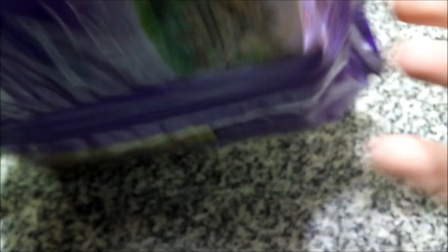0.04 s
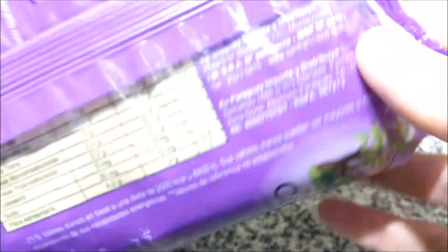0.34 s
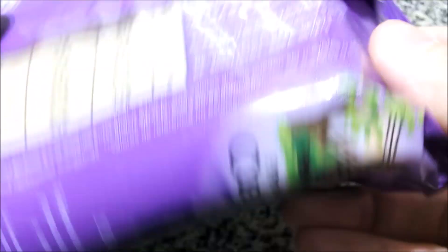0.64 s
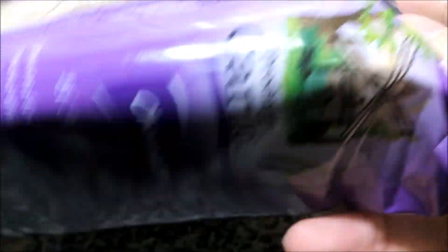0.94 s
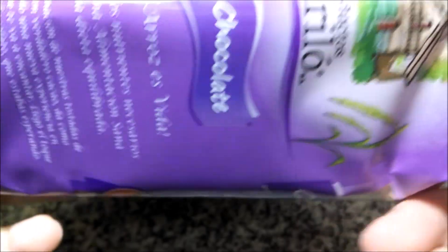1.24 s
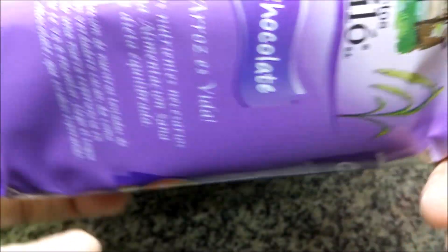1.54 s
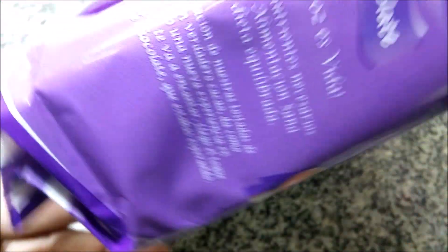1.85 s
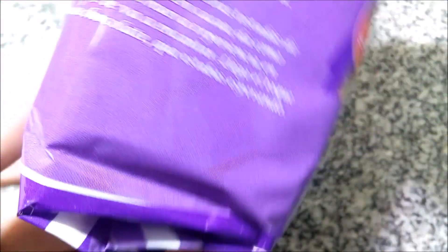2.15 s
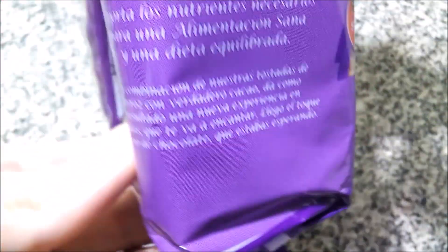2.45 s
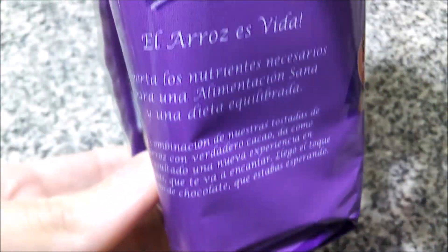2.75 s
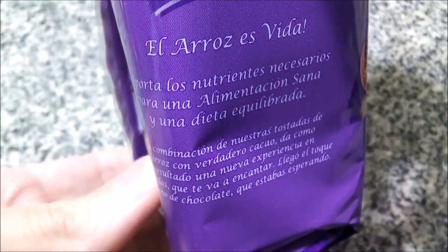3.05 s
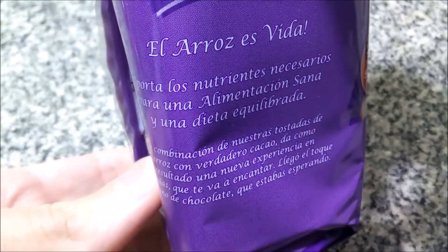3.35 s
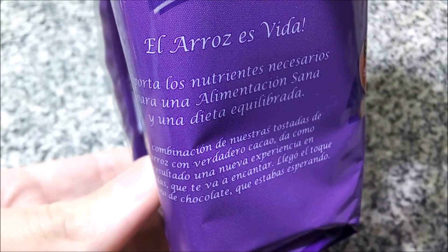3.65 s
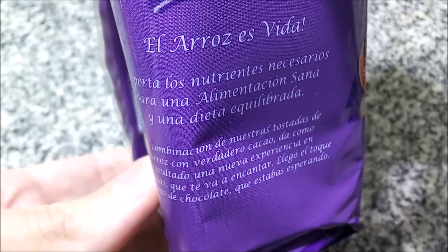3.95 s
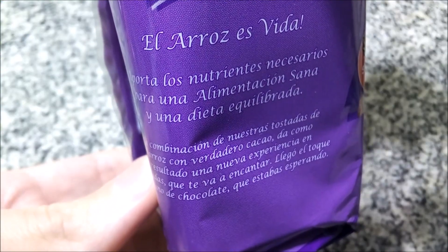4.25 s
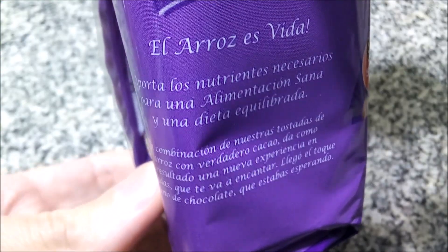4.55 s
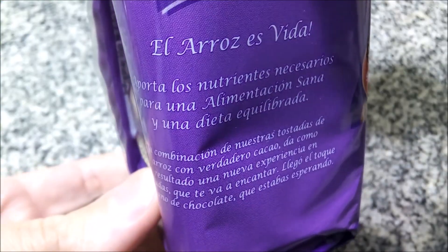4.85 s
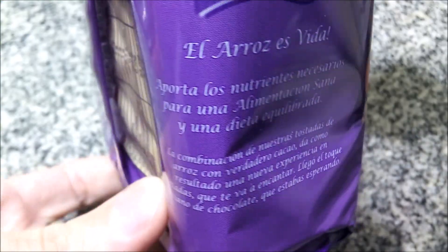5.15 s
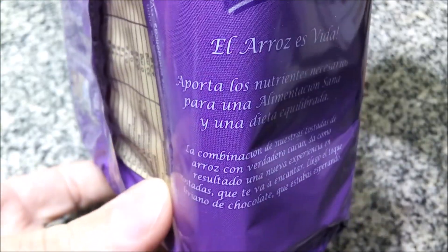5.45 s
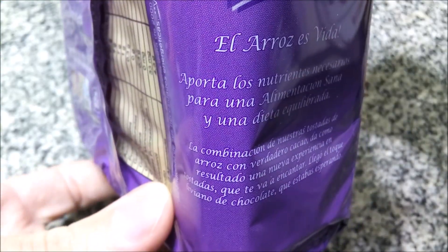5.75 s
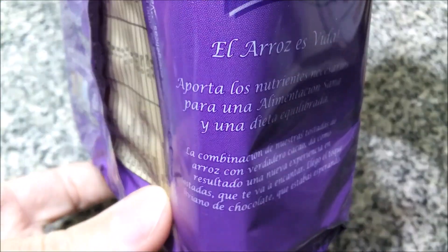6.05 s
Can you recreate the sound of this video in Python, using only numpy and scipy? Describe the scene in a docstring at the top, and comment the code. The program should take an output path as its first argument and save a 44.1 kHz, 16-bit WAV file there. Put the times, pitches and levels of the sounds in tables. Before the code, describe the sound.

Close, crisp crinkling of a plastic packet being handled, busy at first, then pausing before a few lighter crackles.

```python
"""In a small quiet room, a plastic snack packet is turned over above a stone counter, near a phone.
Each fresh grip loads the film: tiny creases crackle and the fingers slide until it relaxes.
Large creases snap through one by one, rattling the sheet and exciting the air modes of the pouch.
Short pitched pops and dull ticks colour some snaps. Counter and room reflect it all over a faint hum."""
import sys
import numpy as np
from scipy import signal
from scipy.fft import rfft, irfft
from scipy.io import wavfile

SR = 44100
rng = np.random.default_rng(int(sys.argv[2]) if len(sys.argv) > 2 else 0)


def master_out(mix):
    """Clip the mix to full scale and print it as 16-bit PCM to the path in sys.argv[1]."""
    frames = np.transpose(np.atleast_2d(mix))
    ceiling = np.clip(frames, -1, 1)
    pcm = np.round(ceiling * 32767).astype(np.int16)
    wavfile.write(sys.argv[1], SR, pcm)


N = 277389


def undb(db):
    """Amplitude ratio of a level in decibels."""
    return 10 ** (np.asarray(db) / 20)


def unit(x):
    """Normalisation to rms 1."""
    return x / np.sqrt(np.mean(x ** 2))


def noise(size):
    """Gaussian white noise."""
    return rng.standard_normal(size)


def band(x, lo_hz, hi_hz, order=2):
    """Causal Butterworth band-pass."""
    sos = signal.butter(order, [lo_hz, min(hi_hz, .48 * SR)], "band", fs=SR, output="sos")
    return signal.sosfilt(sos, x)


def resonate(x, hz, width_hz):
    """Forced response of a damped oscillator, gain 1 at resonance."""
    return signal.lfilter(*signal.iirpeak(hz, hz / width_hz, fs=SR), x)


def resonate_twice(x, hz, width_hz):
    """Two equal resonators in cascade: a narrower peak with steeper skirts."""
    return resonate(resonate(x, hz, width_hz), hz, width_hz)


def response(points, size=2048):
    """Minimum-phase impulse response of a spectrum given as (f/Hz, level/dB) points."""
    hz, db = np.transpose(points)
    grid_hz = np.fft.rfftfreq(size, 1 / SR) + 1
    magnitude = undb(np.interp(np.log(grid_hz), np.log(hz), db))
    cepstrum = irfft(np.log(magnitude))
    cepstrum[1:size // 2] *= 2
    cepstrum[size // 2 + 1:] = 0
    return irfft(np.exp(rfft(cepstrum)))


def through(x, h):
    """Convolution with an impulse response."""
    return signal.fftconvolve(x, h)[:len(x)]


def drift(per_s):
    """Random modulation: straight lines between Gaussian values of spread 1."""
    knots = noise(int(N / SR * per_s) + 2)
    return np.interp(np.arange(N) / SR * per_s, np.arange(len(knots)), knots)


def burst(x, db):
    """Energy normalisation: a transient gets the energy of 5 ms at this level."""
    return x * undb(db) * np.sqrt(.005 * SR / np.sum(x ** 2))


def room_air(air_db=-70.5):
    """Ambient noise: a low broadband murmur with narrow bands heard as hum and whine."""
    # spectrum of the still air: f/Hz, level/dB
    air_spectrum = [(25, -18.5), (90, -15.5), (125, -4), (190, -0.5), (300, -11), (500, -15), (900, -14.5),
                    (2000, -25), (5000, -23.5), (8500, -21), (10000, -30.5), (16000, -34.5)]
    # steady tones: f/Hz, bandwidth/Hz, level/dB
    tones = [(117.03, 3.3, -84), (179.8, 5.6, -84.5), (4700, 140, -89.5), (7950, 130, -82.5)]
    murmur = unit(through(noise(N), response(air_spectrum))) * undb(air_db + 0.4 * drift(8.1))
    hum = sum(undb(db) * unit(resonate_twice(noise(N), hz, width)) for hz, width, db in tones)
    return murmur + hum


def handling_level(attack_s=0.017, relax_s=0.034):
    """Rustle level in dB: each grip loads the film, holds and relaxes exponentially; powers add."""
    # rustle of the whole packet being moved: t/s, level/dB
    movement = [(0, -50), (1.15, -49), (1.55, -61.5), (1.75, -52), (2.5, -51), (3.1, -65.5), (3.3, -82),
                (4.6, -84), (4.9, -63.5), (5.45, -62), (5.7, -85.5)]
    # fresh grips: onset t/s, hold t/s, level/dB
    grips = [(0.0, 0.15, -34.5), (.28, 0.016, -43.5), (.38, 0.2, -39), (.6, 0.036, -32.5),
             (.78, 0.082, -39.5), (1.034, 0.016, -41), (1.188, 0.015, -39), (1.331, 0.12, -50.5),
             (1.631, 0.09, -54), (2.03, 0.15, -47), (2.208, 0.15, -39), (2.38, 0.15, -44.5),
             (2.698, 0.037, -45.5), (4.522, 0.09, -55), (4.769, 0.052, -54.5), (4.869, 0.038, -48.5),
             (5.058, 0.025, -42), (5.16, 0.14, -52.5), (5.322, 0.09, -54.5), (5.52, 0.065, -60.5)]
    t = np.arange(N) / SR
    power = undb(np.interp(t, *np.transpose(movement))) ** 2
    for start, held, db in grips:
        attack = np.clip(1 + (t - start) / attack_s, 0, 1)
        release = np.exp(-np.maximum(t - start - held, 0) / relax_s)
        power += (undb(db) * attack * release) ** 2
    return 10 * np.log10(power)


def buckle(ring_db, ring_s, slip_s=0.00045, scatter_db=-5, size=2048, modes=12):
    """Buckling: a crease flips abruptly; bending waves scatter and briefly ring the panels round it."""
    t = np.arange(size) / SR
    flip = unit(noise(size) * t * np.exp(-2 * t / slip_s))
    panel_hz = rng.uniform(1400, 10000, (modes, 1))
    phase_cycles = rng.random((modes, 1))
    panels = unit(np.sin(2 * np.pi * (panel_hz * t + phase_cycles)).sum(axis=0))
    scatter = undb(scatter_db) * noise(size)
    fade = np.exp(-t / ring_s) * (1 - np.exp(-t / slip_s))
    return flip + undb(ring_db) * unit((scatter + panels) * fade)


def crackle(film, handling_db, spread_db=6.5, bunch_db=5, ticks_db=-2.5, hollow_db=-20.5, creases=18):
    """Clustered Poisson process: tiny creases tick, faster in a firm grip, each ringing its own panel."""
    rate = 240 * undb(.3 * (handling_db + 46))
    chance = rate * undb(bunch_db * drift(70)) / creases / SR  # ticks come in irregular bunches
    crease_pitches = np.geomspace(2400, 11000, creases)
    panel_pitches = rng.permutation(np.geomspace(420, 1400, creases))
    ticks, hollow = np.zeros(N), np.zeros(N)
    for hz, panel_hz in zip(crease_pitches, panel_pitches):
        fires = rng.random(N) < chance
        sizes = np.zeros(N)
        sizes[fires] = undb(spread_db * np.minimum(rng.exponential(size=fires.sum()), 2.8))
        tick = through(sizes / np.sqrt(rate), buckle(ring_db=-11, ring_s=.003, slip_s=.0003))
        ticks += resonate(tick, hz, width_hz=0.5 * hz)
        hollow += resonate(tick, panel_hz, width_hz=70) / panel_hz
    radiated = unit(through(ticks, film))
    return undb(handling_db) * (undb(ticks_db) * radiated + undb(hollow_db) * unit(hollow))


def finger_friction(film, handling_db, hiss_db=-5.5, rough_db=3.5, rumble_db=-26.5):
    """Sliding friction: skin drags unevenly over the film and hisses; the shifting grip rumbles."""
    # fingertip strokes: onset t/s, duration t/s, centre f/Hz, bandwidth/Hz, level/dB
    strokes = [(3.753, 0.17, 5020, 3410, -71), (4.28, 0.3, 5580, 7570, -61.5),
               (5.244, 0.23, 1530, 1690, -61.5), (6.177, 0.069, 5360, 3550, -65.5)]
    hiss = through(noise(N), film) * undb(rough_db * drift(90))
    rumble = unit(band(noise(N), 130, 260)) * undb(rough_db * drift(30))
    out = undb(handling_db) * (undb(hiss_db) * unit(hiss) + undb(rumble_db) * rumble)
    for start, length, hz, width, db in strokes:
        progress = np.clip((np.arange(N) / SR - start) / length, 0, 1)
        speed = np.abs(np.sin(np.pi * progress))
        catches = hiss * undb(rough_db * drift(400))
        out += undb(db) * np.sqrt(speed) * unit(resonate_twice(catches, hz, width))
    return out


def pouch(push, detune=0.046):
    """Cavity resonance: the air-filled pouch rings, its modes shifted at random by the changing grip."""
    # modes of the pouch: f/Hz, bandwidth/Hz, level/dB
    modes = [(356, 36, -9), (650.5, 81, 1.5), (996, 70, -2), (1240, 110, -4.5)]
    return sum(undb(db) * resonate(push, hz * np.exp(detune * rng.standard_normal()), width)
               for hz, width, db in modes)


def snaps(film, crest_db=13.5, flex_gain_db=-4.5, thump_gain_db=1, direct_db=-13, sparkle_db=-22):
    """Snap-through instability: a large crease cracks, flexes the sheet and thumps the pouch."""
    # large creases: t/s, crack peak level/dB, crack f/Hz, flex level/dB, thump level/dB (before gains)
    creases = [(0.0206, -6, 8000, -65, -68), (0.0315, -13, 8300, -41, -70), (0.051, -9.5, 7500, -46, -44.5),
               (0.0765, -12.5, 8200, -42, -67), (0.083, -9.5, 8400, -38, -36.5),
               (0.1437, -5.5, 7900, -49, -31.5), (0.1455, -11, 8250, -34, -38.5),
               (0.173, -4.5, 7900, -28.5, -43.5), (0.2064, -16.5, 7250, -38, -45),
               (0.233, -14, 8700, -38.5, -39), (0.2612, -18.5, 8400, -36, -44.5),
               (0.3016, -23, 7660, -43, -48), (0.333, -20, 8200, -31.5, -73),
               (0.3526, -18.5, 4930, -28.5, -57), (0.387, -13.5, 9480, -28, -37.5),
               (0.396, -6.5, 7800, -32, -37.5), (0.46, -17.5, 7800, -26.5, -47.5),
               (0.5096, -15, 6860, -39, -45), (0.5305, -13, 7390, -29, -39), (0.542, -6, 6840, -27.5, -38),
               (0.607, -19, 8900, -29.5, -38), (0.613, -15, 7200, -26, -41), (0.62, -9.5, 7400, -25.5, -34),
               (0.629, -14, 7500, -49, -57), (0.6483, -15.5, 6900, -26, -31.5),
               (0.6678, -36, 6490, -46, -71), (0.6832, -15.5, 7130, -51, -67),
               (0.6964, -10, 7800, -30, -38), (0.829, -11, 7250, -49, -38),
               (0.8523, -10.5, 9500, -31, -38.5), (0.8846, -5, 8500, -22.5, -36),
               (0.9623, -16.5, 7600, -34, -40.5), (1.098, -11.5, 7440, -28, -41),
               (1.1053, -5, 8250, -35, -46), (1.1527, -16.5, 4800, -69, -46.5),
               (1.1797, -11.5, 8600, -35, -40), (1.193, -6, 6860, -48, -44),
               (1.3896, -21, 8250, -42, -45.5), (1.4532, -22, 7500, -40.5, -48),
               (1.496, -27, 3850, -40, -53), (1.6262, -14.5, 6620, -31, -46.5),
               (1.678, -20.5, 7900, -42, -78), (1.6984, -16.5, 7900, -42, -62),
               (1.715, -14, 8800, -25.5, -72), (1.8421, -21, 3340, -46, -73),
               (1.8624, -26.5, 6000, -46, -50), (1.8685, -15, 7860, -39, -43),
               (2.0167, -16, 9400, -50, -62), (2.074, -18, 8240, -36, -48.5),
               (2.0816, -15.5, 6400, -37, -70), (2.134, -14.5, 6440, -57, -47.5),
               (2.2077, -1.5, 5630, -35, -35), (2.2181, -13.5, 7600, -27, -52.5),
               (2.2541, -24, 5650, -37, -60.5), (2.2612, -15.5, 6300, -56, -66),
               (2.2798, -11, 6800, -52, -44), (2.3164, -9.5, 7960, -30, -37.5),
               (2.3611, -24.5, 7800, -32, -43), (2.5154, -17, 7140, -69, -45),
               (2.585, -27, 7200, -34.5, -46), (2.6996, -13.5, 8940, -33.5, -42),
               (2.8003, -21.5, 8800, -42.5, -60.5), (2.8562, -25, 8200, -41.5, -62),
               (2.9391, -22.5, 5570, -34.5, -51), (3.1197, -39, 8100, -51, -55),
               (3.3289, -41, 7940, -74, -87), (4.1054, -28, 7760, -72.5, -75),
               (4.5431, -28, 6700, -48, -51), (4.5652, -26.5, 7380, -77.5, -70),
               (4.6282, -38.5, 5760, -46.5, -47), (4.7263, -39.5, 8000, -68, -83),
               (4.766, -20, 7900, -36, -73), (4.817, -30, 6480, -47.5, -57),
               (4.8864, -24.5, 9250, -35, -39.5), (4.9555, -37, 7200, -55, -59),
               (5.0617, -31, 8150, -48.5, -48), (5.0784, -19.5, 8450, -32.5, -40.5),
               (5.084, -16.5, 8540, -34.5, -39), (5.1603, -27.5, 8200, -46.5, -54.5),
               (5.215, -13, 9440, -42.5, -51.5), (5.2687, -15.5, 8500, -64, -79.5),
               (5.4081, -18, 9300, -32, -53), (5.5119, -27, 6000, -41.5, -84), (5.563, -34, 7430, -70, -83),
               (5.9431, -36, 8550, -60, -80), (6.007, -11.5, 7100, -39.5, -41),
               (6.2211, -27.5, 5800, -55, -79.5)]
    crack_delay_s = .0006  # each snap sounds 0.6 ms after its listed time
    out = np.zeros(N + SR)
    for onset, peak_db, hz, flex_db, thump_db in creases:
        crack_db = peak_db - crest_db
        # a large fold moves more air and sets more of the sheet going; a small one is a dry tick
        bulk = np.clip((thump_db - crack_db + 28) / 22, 0, 1)
        ring_db = -9.5 + 4.5 * bulk
        flip = buckle(ring_db, ring_s=0.0056)
        width_hz = min(4000 * undb(2.2 * (crack_db + 31)), hz)  # harder is shorter, so broader in band
        pitched = resonate(through(flip, film), hz, max(width_hz, hz / 3))
        crack = burst(band(pitched, .45 * hz, 21000), crack_db)
        # tight, high creases have a sparkling edge, the more so when they snap hard
        edge = (width_hz / hz) ** .4 * (hz / 8000) ** 5
        sparkle = edge * burst(band(flip, 10000, 13000), crack_db + sparkle_db)
        flex = band(buckle(ring_db + 2.5, ring_s=0.006), 1300, 4400, order=3)
        push = buckle(ring_db=-1.5, ring_s=0.0055, scatter_db=7.5)
        lowest_hz = np.interp(thump_db, [-50, -38], [540, 230])  # only heavy folds move the whole pouch
        thump = band(pouch(push) + undb(direct_db) * push, lowest_hz, 1700, order=3)
        body = burst(flex, flex_db + flex_gain_db) + burst(thump, thump_db + thump_gain_db)
        start = int((onset + crack_delay_s) * SR)
        out[start:start + len(body)] += crack + sparkle + body
    return out[:N]


def pitched_pops(relative_width=.38):
    """Damped resonance: short pitched pops and dull ticks, mostly colouring a crease's snap."""
    # pops and ticks: t/s, f/Hz, level/dB
    pops = [(0.733, 383, -51), (1.627, 724, -44.5), (1.698, 3630, -31.5), (1.9483, 1310, -44),
            (2.208, 130, -59.5), (2.2087, 2714, -28), (2.705, 595, -43.5), (2.94, 3176, -40),
            (3.075, 938, -50.5), (4.878, 1095, -44), (4.887, 610, -37), (5.65, 2035, -56),
            (6.008, 375, -41), (6.222, 1660, -49.5)]
    out = np.zeros(N + SR)
    for onset, hz, db in pops:
        click = buckle(ring_db=-6, ring_s=0.006)
        pop = burst(resonate_twice(click, hz, relative_width * hz), db)
        start = int(onset * SR)
        out[start:start + len(pop)] += pop
    return out[:N]


def reverberation(x, early_db=-12, early_t60=0.12, late_db=-19, late_t60=0.22, build_s=0.0067):
    """Exponential decay: quick reflections from the counter and nearby things, then a weak room tail."""
    t = np.arange(SR // 2) / SR
    build_up = 1 - np.exp(-(t / build_s) ** 2)
    reflections = np.zeros(len(t))
    for db, t60 in ((early_db, early_t60), (late_db, late_t60)):
        tail = noise(len(t)) * np.exp(-np.log(1000) * t / t60) * build_up
        reflections += undb(db) * tail / np.linalg.norm(tail)
    return through(x, reflections)


def scene():
    """Superposition of the packet's direct sound, its reflections and the room air, in one channel."""
    # spectrum radiated by the film: f/Hz, level/dB
    film_spectrum = [(100, -16.5), (300, -25.5), (620, 1.5), (2000, -3.5), (4500, -5.5), (6500, -1.5),
                     (8000, 1), (8900, 0), (10000, -9), (12000, -12), (16000, -23.5)]
    film = response(film_spectrum)
    handling_db = handling_level()
    packet = snaps(film) + pitched_pops()
    packet += crackle(film, handling_db) + finger_friction(film, handling_db)
    return (packet + reverberation(packet) + room_air())[None]


def record(dry, ceiling=.8, top_hz=15900):
    """Soft saturation and band limiting: the phone rounds the tallest peaks and cuts the top treble."""
    rounded = ceiling * np.tanh(dry / ceiling)
    return signal.sosfilt(signal.ellip(8, .2, 70, top_hz, fs=SR, output="sos"), rounded)


dry = scene()
out = record(dry)
master_out(out)
```